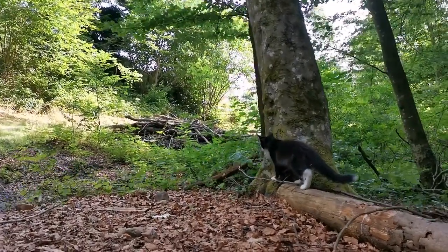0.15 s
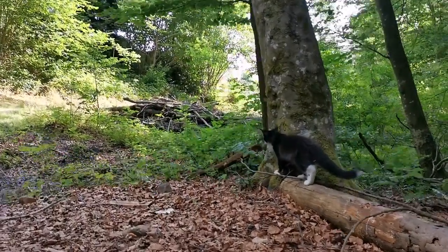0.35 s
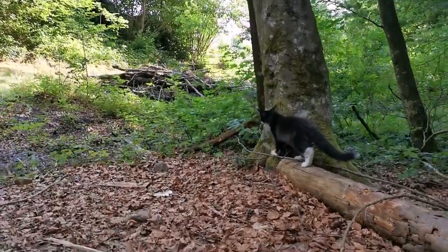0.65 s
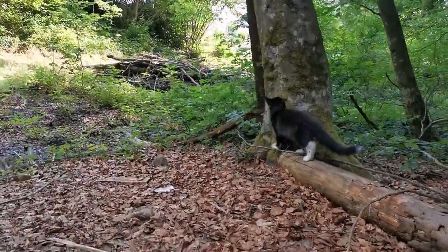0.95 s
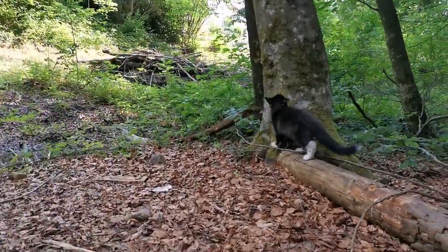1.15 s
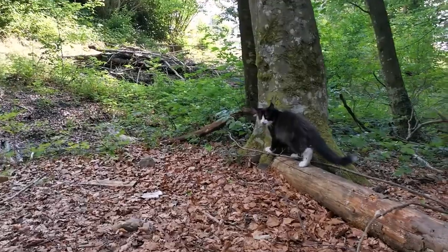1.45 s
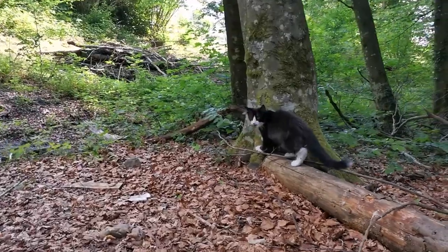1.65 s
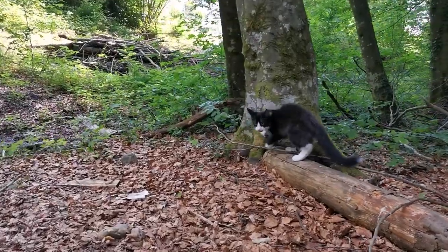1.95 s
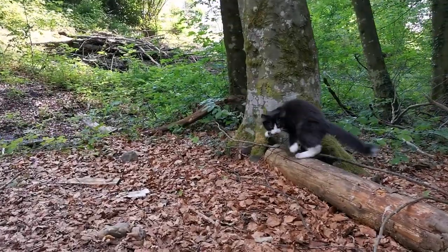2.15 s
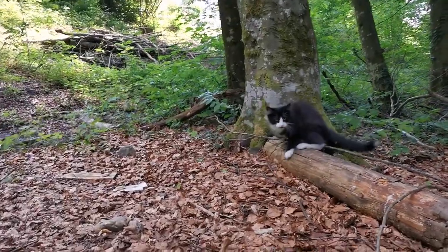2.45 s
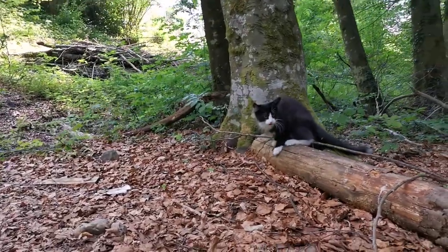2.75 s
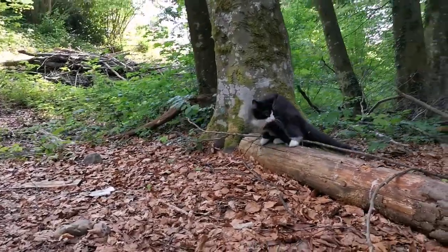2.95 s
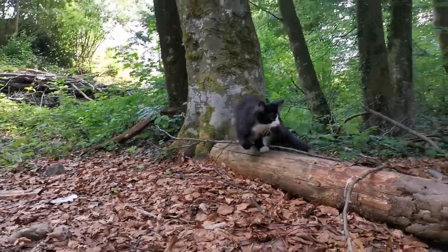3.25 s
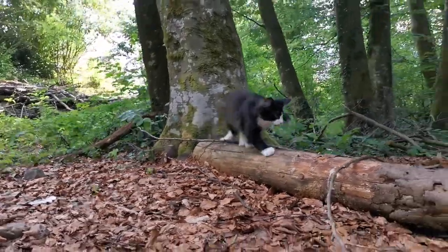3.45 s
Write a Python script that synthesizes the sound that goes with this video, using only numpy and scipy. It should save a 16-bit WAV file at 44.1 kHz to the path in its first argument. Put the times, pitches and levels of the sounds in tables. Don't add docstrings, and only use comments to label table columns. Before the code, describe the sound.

Birdsong far off among trees, with nearby leaf crunching, ticks and sharp twig cracks

```python
import sys
import numpy as np
from scipy import signal
from scipy.fft import rfft, irfft
from scipy.io import wavfile

SR = 44100
rng = np.random.default_rng(int(sys.argv[2]) if len(sys.argv) > 2 else 0)


def gain_from_decibels(decibels):
    exponent = np.asarray(decibels, float) / 20
    return 10 ** exponent


def generate_wav(sig):
    pcm = np.round(np.clip(np.atleast_2d(sig).T, -1, 1) * 32767).astype(np.int16)
    wavfile.write(sys.argv[1], SR, pcm)


N = 158760
T = np.arange(N) / SR
PORT_LAG_S = 0.000113


def rms_one(x):
    return x / np.sqrt(np.mean(x ** 2) + 1e-20)


def colour(x, points, share=1):
    hz, db = np.transpose(points)
    log_f = np.log(np.maximum(np.arange(N // 2 + 1) * SR / N, 1))
    gain = gain_from_decibels(share * np.interp(log_f, np.log(hz + 1), db))
    return irfft(rfft(x) * gain, N)


def drift(rate):
    return rms_one(np.interp(T * rate, np.arange(N // 100), rng.standard_normal(N // 100)))


def noise(count):
    return rng.standard_normal((count, N))


def ring(clicks, hz, t60):
    r, w = gain_from_decibels(-60 / (t60 * SR)), 2 * np.pi * hz / SR
    return signal.lfilter([0, np.sin(w)], [1, -2 * r * np.cos(w), r * r], clicks + 1e-18)


def place(x, lag_s, pan_db):
    f = np.arange(N // 2 + 1) * SR / N
    late = irfft(rfft(x) * np.exp(-2j * np.pi * f * lag_s), N)
    return np.array([x * gain_from_decibels(pan_db / 2), late * gain_from_decibels(-pan_db / 2)])


# f/Hz, level/dB (per Hz)
HISS_TONE = [(10500, -30), (12500, -4), (14500, -1), (15400, -8), (15700, -40)]


def hiss():
    return gain_from_decibels(-91) * rms_one(colour(noise(2), HISS_TONE))


# f/Hz, level/dB (per Hz)
HUSH_TONE = [(60, 4), (660, -10.5), (3800, -7.5), (4500, -5.5), (7400, -10.5), (9000, -33), (11500, -41),
             (15000, -51)]


def hush():
    shared = place(rng.standard_normal(N), PORT_LAG_S, 1.5)
    air = rms_one(colour(noise(2) + 2.9 * shared, HUSH_TONE))
    return gain_from_decibels(-56.5 + drift(6.48)) * air


# t/s, length/s, level/dB
WIND_PUFFS = [
    (0.195, 0.055, -52),
    (0.616, 0.027, -51),
    (1.146, 0.021, -50.5),
    (1.556, 0.088, -60),
    (2.304, 0.026, -51),
    (2.525, 0.049, -51.5),
    (3.01, 0.12, -56),
]


def wind():
    gust = gain_from_decibels(-69.5 + drift(15))
    for s, length, db in WIND_PUFFS:
        gust += gain_from_decibels(db) * np.exp(-0.5 * ((T - s) / length) ** 2)
    band = signal.butter(2, [40, 98], "band", fs=SR, output="sos")
    low = signal.sosfilt(band, noise(3))
    return gust * rms_one(low[:2] + 0.94 * low[2])


def forest(x):
    low_t60_s, treble_t60_s, split_hz, onset_s = 0.72, 0.5, 4600, 0.0038
    t, grain = T[:SR], noise(3)
    grain = (grain[:2] + 0.74 * place(grain[2], PORT_LAG_S, -4))[:, :SR]
    low = signal.sosfilt(signal.butter(4, split_hz, fs=SR, output="sos"), grain)
    high = signal.sosfilt(signal.butter(4, split_hz, "high", fs=SR, output="sos"), grain)
    tail = low * gain_from_decibels(-60 * t / low_t60_s) + high * gain_from_decibels(-60 * t / treble_t60_s)
    tail *= 1 - np.exp(-t / onset_s)
    tail /= np.sqrt(np.sum(tail ** 2, axis=1, keepdims=True))
    return signal.fftconvolve(x[None], tail, axes=1)[:, :N]


def whistles(rows, bend, wobble_hz, swing_hz=0, swell=0.044):
    buzz_hz, attack_s, release_s = 172.6, 0.002, 0.0022
    out = np.zeros(N)
    buzz = np.sin(2 * np.pi * np.cumsum(buzz_hz * (1 + 0.27 * drift(60))) / SR)
    wobble = wobble_hz * drift(400) + swing_hz * buzz
    flutter = drift(120)
    for s, length, from_hz, to_hz, db in rows:
        i = slice(int(s * SR), int((s + length) * SR))
        t = T[i] - s
        left = np.clip(1 - t / length, 0, 1) ** bend
        hz = to_hz + (from_hz - to_hz) * left + wobble[i]
        shape = np.clip(np.minimum(t / (attack_s + swell * length), (length - t) / release_s), 0, 1)
        out[i] += gain_from_decibels(db + 4.0 + 1.3 * flutter[i]) * shape * np.sin(2 * np.pi * np.cumsum(hz) / SR)
    return out


# t/s, length/s, from f/Hz, to f/Hz, level/dB
WHEEZE_NOTES = [
    (.2, 0.085, 7150, 6300, -48.5),
    (2.547, 0.12, 7200, 6700, -51),
    (2.31, 0.13, 5450, 5750, -55),
    (2.6, .09, 4050, 4300, -59.5),
    (1.3, .1, 3700, 3000, -55),
    (1.7, .12, 3900, 2900, -53),
    (1.9, .09, 3500, 2700, -55),
    (2.19, .09, 3300, 3800, -53.5),
]


def wheezes():
    return whistles(WHEEZE_NOTES, bend=1.3, wobble_hz=155.7, swing_hz=400, swell=0.28)


# t/s, length/s, from f/Hz, to f/Hz, level/dB
THRUSH_NOTES = [(0, 0.028, 3083, 3080, -53), (0, 0.072, 2450, 2400, -69), (.082, 0.029, 3520, 3090, -60.5),
                (.150, 0.027, 2900, 2844, -61), (.268, 0.032, 3850, 4140, -62.5),
                (.345, 0.034, 4000, 3560, -57.5), (.373, 0.063, 3600, 3634, -62.5),
                (.465, 0.045, 2500, 2630, -69), (.53, 0.049, 2750, 2830, -67.5),
                (1.110, 0.022, 1940, 1900, -66), (1.15, 0.12, 1990, 2018, -63),
                (1.335, 0.038, 3150, 3100, -58), (1.45, .06, 3000, 3170, -49),
                (1.875, .045, 2910, 2040, -53.5), (1.91, 0.077, 2030, 1986, -61.5),
                (1.970, 0.038, 3000, 3446, -46.5), (2.010, 0.036, 3356, 3364, -46),
                (2.003, 0.045, 7500, 7670, -64), (2.055, 0.067, 7500, 6880, -63),
                (2.2, 0.054, 6980, 7300, -67)]


def thrush():
    return whistles(THRUSH_NOTES, bend=0.857, wobble_hz=28.2)


# t/s, length/s, from f/Hz, to f/Hz, level/dB
FINCH_NOTES = [(.548, 0.015, 4820, 4780, -53), (.650, 0.034, 6700, 5060, -49.5),
               (.690, 0.024, 4800, 4540, -57), (.720, 0.014, 4390, 3850, -52.5),
               (.796, 0.023, 6670, 5170, -45), (.840, 0.028, 4750, 4380, -53),
               (.862, 0.009, 4330, 3580, -48), (.945, 0.024, 6860, 4910, -43.5),
               (.985, 0.025, 4800, 4450, -51.5), (1.010, 0.038, 4090, 3826, -51),
               (1.095, 0.017, 4670, 3690, -47), (1.112, 0.03, 3890, 2950, -46),
               (1.145, 0.052, 3250, 2710, -50), (1.245, 0.032, 5200, 3360, -47),
               (1.290, 0.0525, 3300, 3072, -50), (1.400, 0.047, 4373, 2943, -44.5),
               (1.545, 0.027, 5000, 3650, -46), (1.600, 0.04, 3000, 3310, -48),
               (1.67, .035, 3300, 3050, -50.5), (1.700, 0.055, 4270, 3920, -50),
               (1.790, 0.043, 3137, 3224, -53), (2.106, 0.018, 4860, 4950, -49.5),
               (2.12, 0.022, 4950, 5500, -51), (2.57, 0.052, 3850, 4350, -53.5),
               (2.51, .05, 3500, 3910, -60), (2.13, 0.029, 4600, 3670, -47),
               (2.17, 0.052, 3950, 3290, -50.5), (3.03, 0.031, 5600, 5360, -52),
               (3.15, .03, 5400, 5600, -56)]


def finch():
    return whistles(FINCH_NOTES, bend=1.6, wobble_hz=49.7)


# t/s, level/dB
TIT_CALLS = [
    (.71, -44),
    (0.823, -41),
    (.970, -40),
    (1.053, -46),
    (1.123, -48.5),
    (1.21, -43.5),
    (1.291, -43.5),
]


def tit():
    hook_s, from_hz, to_hz = 0.0089, 4900, 7300
    rows = [(s, hook_s, from_hz, to_hz, db) for s, db in TIT_CALLS]
    return whistles(rows, bend=2.1, wobble_hz=60.5)


def birds():
    f, th, ti, wh = finch(), thrush(), tit(), wheezes()
    direct = place(f, 0.00015, -1.8) + place(th, 0.000091, 6.0)
    direct += place(ti, 0.00027, 1.0) + place(wh, 0.00033, 11)
    to_left = gain_from_decibels(np.array([[3], [-3]]))
    scattered = forest(f + th + ti) + forest(wh) * to_left
    return gain_from_decibels(-4) * direct + gain_from_decibels(3) * scattered


# f/Hz, lead/radians
CASE_LEAD_BY_PITCH = [(80, 0.65), (320, 1.0), (600, 0.96), (1200, 0.82)]


def contacts(rows, modes, rise_s):
    out = np.zeros((2, N))
    lead_hz, lead = np.transpose(CASE_LEAD_BY_PITCH)
    for s, peak_db in rows:
        t = np.maximum(T - s, 0)
        rise = 1 - np.exp(-(t / rise_s) ** 2)
        for hz, db, t60 in modes:
            turn = np.interp(hz, lead_hz, lead) * np.array([[0.5], [-0.5]])
            level = gain_from_decibels(peak_db + db - 60 * t / t60)
            out += rise * level * np.sin(2 * np.pi * hz * (t - rise_s) + turn)
    return out


# t/s, level/dB (peak)
FINGER_PADS = [
    (.0645, -36.5),
    (.311, -35.5),
    (3.454, -45),
]
# f/Hz, level/dB, t60/s
PAD_MODES = [(167, -2.5, 0.062), (484, 14, 0.012)]


def finger_pads():
    return contacts(FINGER_PADS, PAD_MODES, rise_s=0.0019)


# t/s, level/dB (peak)
KNUCKLE_KNOCKS = [
    (0.4138, -20),
]
# f/Hz, level/dB, t60/s
CASE_MODES = [(76, -6, 0.11), (298, -5.5, 0.045), (593, 17, 0.013), (1177, 19.5, 0.0061),
              (1900, -4.5, 0.0096)]


def knuckle_knocks():
    return contacts(KNUCKLE_KNOCKS, CASE_MODES, rise_s=0.0032)


# t/s, length/s, crisp level/dB, dull level/dB
FOOT_SCUFFS = [(0.483, 0.32, -53.5, -99), (0.679, 0.076, -48, -70), (1.289, 0.1, -40.5, -56),
               (1.435, 0.082, -43.5, -53), (1.557, 0.13, -42, -56.5), (1.724, 0.097, -39.5, -94),
               (2.299, 0.24, -51.5, -82), (2.581, .1, -46.5, -58.5), (2.765, 0.085, -56.5, -65),
               (2.844, 0.087, -50, -60), (2.945, 0.18, -43, -57), (3.17, 0.18, -52.5, -94),
               (3.379, .2, -51, -73)]
# f/Hz, level/dB (per Hz)
CRISP_TONE = [(700, -28), (2500, -6.5), (7200, -3), (8800, -22), (11500, -33), (14500, -36), (15800, -56)]
# f/Hz, level/dB (per Hz)
DULL_TONE = [(150, -22), (450, -2), (1400, 5), (2600, -31)]


def leaves():
    attack_s, release_s, grains_per_s, spread_db = 0.027, 0.037, 4000, 4
    swells = []
    for s, length, _, _ in FOOT_SCUFFS:
        fade = np.exp(-np.maximum(T - s - length, 0) / release_s)
        swells.append(np.clip((T - s) / attack_s, 0, 1) * fade)
    sizes = gain_from_decibels(spread_db * np.minimum(rng.exponential(1, N), 5)) * rng.choice([-1, 1], N)
    born = rng.random(N) < grains_per_s * gain_from_decibels(4 * drift(25)) / SR
    clicks = sizes * born
    dealt = rng.integers(0, 12, N)
    grains = 0.62 * clicks
    for k, hz in enumerate(np.geomspace(500, 12000, 12)):
        grains = grains + ring(clicks * (dealt == k), hz, 5.2 / hz) * np.sqrt(hz / 8000)
    mix = 0.26 * place(rms_one(grains), PORT_LAG_S, 1.05) + 0.26 * noise(2)
    _, _, crisp_db, dull_db = np.transpose(FOOT_SCUFFS)
    crisp = gain_from_decibels(crisp_db) @ np.array(swells) * rms_one(colour(mix, CRISP_TONE))
    dull = gain_from_decibels(dull_db) @ np.array(swells) * rms_one(colour(mix, DULL_TONE))
    return crisp + dull


# t/s, level/dB (peak), f/Hz (centre)
SOLE_CRUNCHES = [(0.999, -48.5, 1710), (1.373, -39, 547), (1.483, -34.5, 1550), (1.552, -29, 860),
                 (1.597, -35.5, 1590), (1.61, -38.5, 1240), (1.639, -29.5, 1050), (2.183, -44.5, 1370),
                 (2.335, -42, 1620), (2.946, -41, 348), (3.133, -42, 500)]


def crunches():
    out, t = np.zeros(N + 2048), T[:2048]
    for s, db, hz in SOLE_CRUNCHES:
        burst = rng.standard_normal(2048) * gain_from_decibels(-60 * t / 0.016)
        burst = ring(burst, hz, 6.0 / hz)
        i = int(s * SR)
        out[i:i + 2048] += gain_from_decibels(db) * burst / np.abs(burst).max()
    return colour(out[:N], [(200, -11), (400, 1.5)])


def cracks(rows, low_db, top_db):
    tail_t60_s, tail_db, late_s = 0.0056, -5.5, 0.00109
    out, t = np.zeros(N + 4096), T[:2048]
    for s, db in rows:
        burst = gain_from_decibels(tail_db) * rng.standard_normal(2048) * gain_from_decibels(-60 * t / tail_t60_s)
        burst[:4] += [2.0, -1.26, -0.04, -1.5]
        i = int((s + late_s) * SR)
        out[i:i + 2048] += gain_from_decibels(db) * burst
    tone = [(150, low_db - 18), (500, low_db - 12.0), (2000, low_db), (7500, -2.0),
            (9000, -28), (12000, -30.5), (14000, top_db), (16200, top_db - 9)]
    return colour(out[:N], tone)


# t/s, level/dB (peak)
LEAF_TICKS = [(0.0735, -35), (0.1286, -24.5), (.405, -29), (0.509, -19.5), (.519, -30), (.587, -29),
              (1.4808, -19.5), (1.5537, -11), (1.6147, -29), (1.68, -33), (1.7574, -28), (1.9515, -34),
              (2.0802, -35), (2.3641, -25), (2.5282, -33), (2.6125, -28), (2.6264, -17), (2.934, -23.5),
              (2.9637, -11), (2.983, -27), (3.2255, -20.5), (3.274, -19)]


def leaf_ticks():
    return cracks(LEAF_TICKS, low_db=-15, top_db=-31)


# t/s, level/dB (peak)
TWIG_SNAPS = [(.8914, -31), (1.6973, -18.5), (2.1836, -26.5), (2.9953, -25), (3.0927, -25), (3.1334, -16),
              (3.187, -25), (3.278, -17), (3.3011, -16), (3.3051, -5.5), (3.328, -26.5), (3.3735, -31),
              (3.4143, -26), (3.5758, -28.5)]


def twig_snaps():
    return cracks(TWIG_SNAPS, low_db=6, top_db=-24)


def underfoot():
    snaps = twig_snaps() + leaf_ticks()
    sheen = colour(snaps, [(10500, -44), (12500, 0)])
    body = place(snaps - sheen + crunches(), PORT_LAG_S, 3.2)
    return body + place(sheen, 0.000133, -2.2) + gain_from_decibels(-29.0) * forest(snaps)


def scene():
    background = hiss() + hush() + wind() + birds()
    return background + finger_pads() + knuckle_knocks() + leaves() + underfoot()


def low_pass(x):
    return signal.sosfilt(signal.butter(12, 16510, fs=SR, output="sos"), x)


# f/Hz, level/dB
LEFT_OVER_RIGHT = [(70, -13), (400, -5), (1500, 2), (6500, 3), (9500, 11), (13000, -5)]


def record(dry):
    left = colour(dry[0], LEFT_OVER_RIGHT, share=1 / 2)
    right = colour(dry[1], LEFT_OVER_RIGHT, share=-1 / 2)
    top_cut = signal.cheby2(12, 70, 16600, fs=SR, output="sos")
    mix = signal.sosfilt(top_cut, np.array([left, right]))
    return low_pass(mix)


dry = scene()
out = record(dry)
generate_wav(out)
```